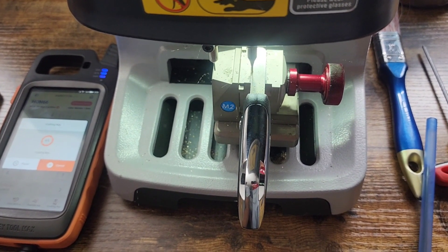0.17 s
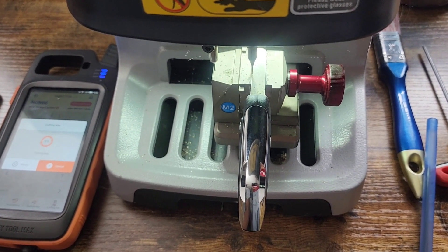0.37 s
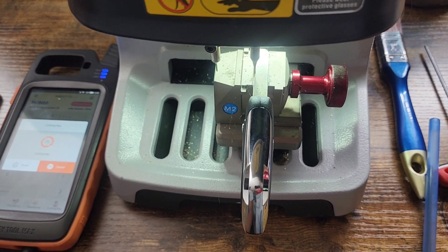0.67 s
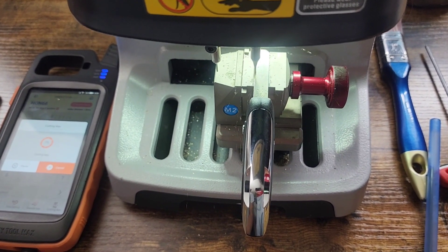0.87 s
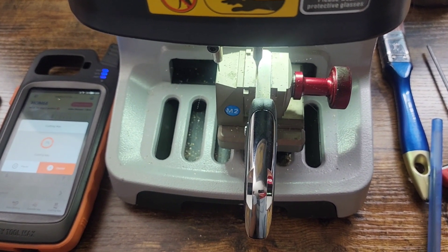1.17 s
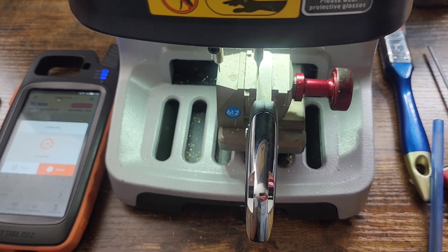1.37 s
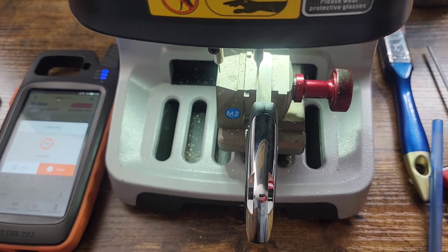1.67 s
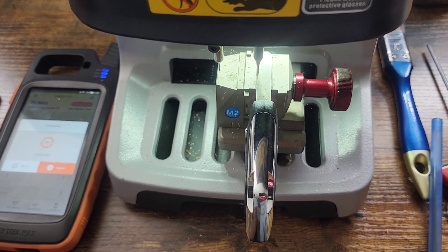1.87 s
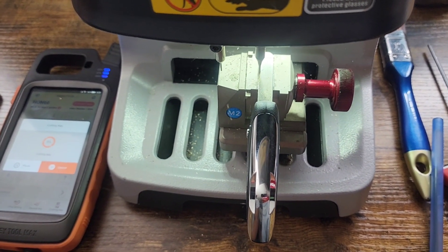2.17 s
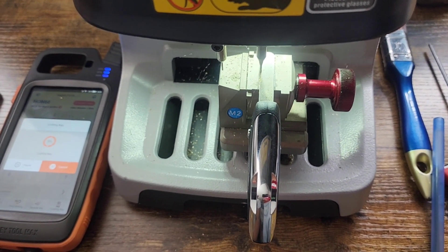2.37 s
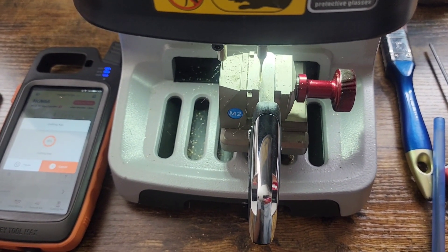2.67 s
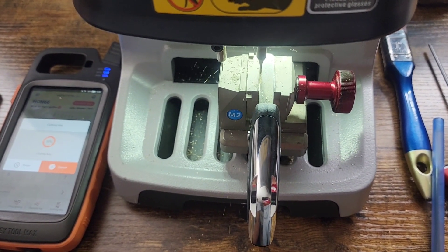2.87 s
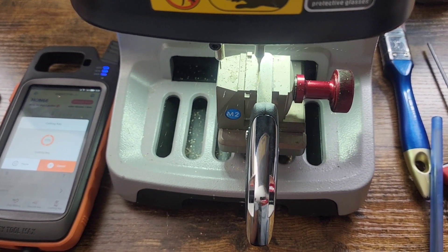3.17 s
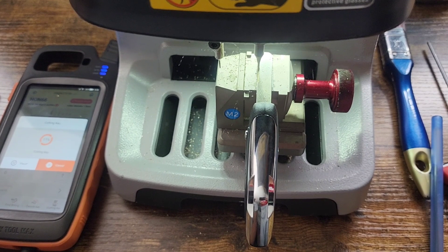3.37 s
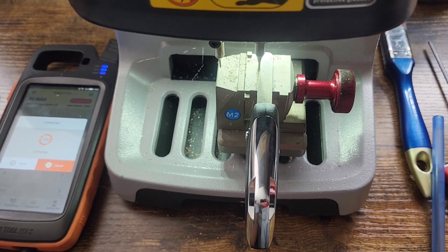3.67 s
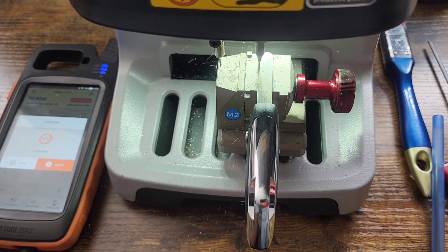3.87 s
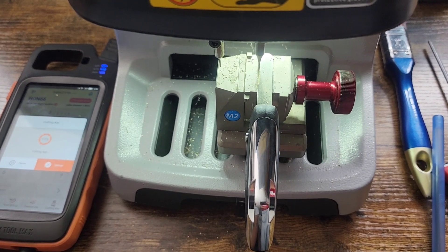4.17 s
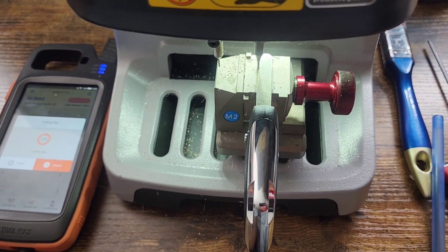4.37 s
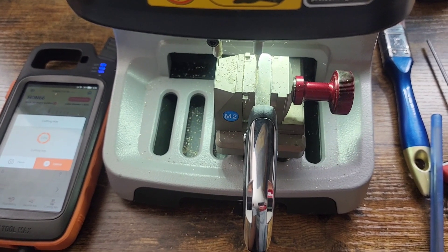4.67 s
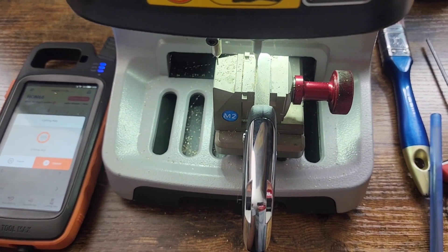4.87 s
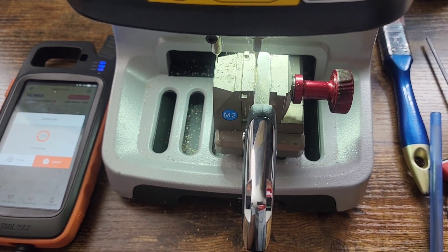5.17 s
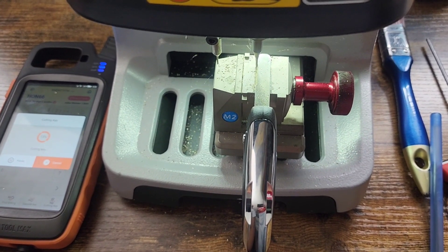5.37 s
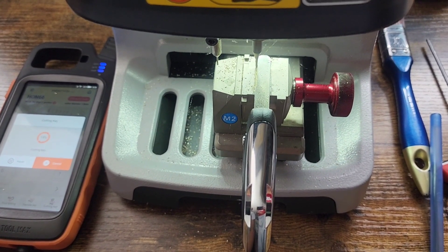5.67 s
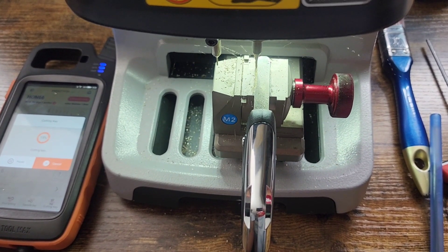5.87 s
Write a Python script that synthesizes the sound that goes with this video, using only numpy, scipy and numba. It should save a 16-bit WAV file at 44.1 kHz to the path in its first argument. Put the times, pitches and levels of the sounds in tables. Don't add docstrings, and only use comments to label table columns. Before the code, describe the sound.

A small key cutting machine drones with a steady buzzing hum and thin high whine, briefly dipping and knocking near the middle as it grinds metal.

```python
import sys
import numpy as np
from scipy import signal
from scipy.fft import rfft, irfft
from scipy.io import wavfile
from scipy.ndimage import uniform_filter1d, map_coordinates
from numba import njit

SR = 44100
rng = np.random.default_rng(int(sys.argv[2]) if len(sys.argv) > 2 else 0)


def master(y):
    cut = np.clip(np.atleast_2d(y).T, -1, 1)
    pcm = np.round(cut * 32767)
    wavfile.write(sys.argv[1], SR, pcm.astype(np.int16))


def gain_from_db(level_db):
    decades = np.asarray(level_db, float) / 20
    return 10 ** decades


N = 265790
TIME = np.arange(N) / SR
COARSE = TIME[::64]
NOMINAL = 199
FOLLOW = .35


def wobble(rate):
    knots = rng.standard_normal(int(N * 40 / SR) + 4)
    return map_coordinates(knots, [COARSE * min(rate, 39)])


def step(at_s, rise_s):
    return .5 + .5 * np.tanh((COARSE - at_s) / rise_s)


def coarse(rows):
    s, *cols = np.transpose(rows)
    return [np.interp(COARSE, s, c) for c in cols]


def turned(rate):
    return np.cumsum(np.interp(TIME, COARSE, rate)) / SR


@njit
def add(out, cycles, drift, left, right, lead):
    for i in range(len(cycles)):
        j = min(i // 64, len(drift) - 2)
        u = i / 64 - j
        phase = 2 * np.pi * cycles[i] + drift[j] + u * (drift[j + 1] - drift[j])
        out[0, i] += (left[j] + u * (left[j + 1] - left[j])) * np.sin(phase + lead)
        out[1, i] += (right[j] + u * (right[j + 1] - right[j])) * np.sin(phase)


def tone(cycles, left_db, right_db, lead, sway_db, flutter_db, jitter):
    shared_db = sway_db * wobble(0.98) + flutter_db * wobble(np.clip(cycles[-1] / 140, 4, 24))
    drift = jitter * wobble(np.clip(cycles[-1] / 90, 5, 25)) + 2 * np.pi * rng.random()
    left, right = [np.sqrt(2) * gain_from_db(db + shared_db + .5 * sway_db * wobble(0.77))
                   for db in (left_db, right_db)]
    out = np.zeros((2, N))
    add(out, cycles, drift, left, right, float(lead))
    return out


# time_s, speed_turns_per_s
SPEED = [(0, 199.15), (.55, 199.07), (1.15, 198.67), (1.85, 198.7), (2.4, 198.41), (2.72, 198.29),
         (3.15, 198.36), (3.55, 198.57), (3.85, 199.06), (4.0, 199.09), (4.3, 198.97), (4.9, 199.48),
         (5.3, 199.74), (5.45, 199.63), (5.62, 199.28), (5.77, 199.17), (5.9, 198.78), (6.03, 198.5)]
# time_s, flute_tone_db, depth (0-1, in the blank)
CUT = [
    (0, -23.4, 0.08),
    (1.7, -23, .05),
    (1.9, -24, .15),
    (2.6, -24.5, 0.69),
    (3.0, -24.5, .95),
    (4.1, -24.9, 1),
    (4.6, -24, 0.81),
    (5.7, -24, 0),
    (6.03, -25, .2),
]
DIP_S, DIP_HALF_S, DIP_DB = 2.75, .04, -10.5
SWELL_S, SWELL_HALF_S, SWELL_DB = 2.81, .03, 2


def motion():
    flute_db, depth = coarse(CUT)
    run_up, run_up_s, settle_s = 1.05, .009, .16
    since = np.maximum(COARSE - DIP_S - DIP_HALF_S, 0)
    gained = run_up * step(DIP_S + run_up_s, 2 * run_up_s) * np.exp(-(since / settle_s) ** 1.5)
    dip = np.maximum(1 - abs(COARSE - DIP_S) / DIP_HALF_S, 0)
    swell_after = np.exp(-((COARSE - SWELL_S) / SWELL_HALF_S) ** 2)
    return coarse(SPEED)[0] + gained, flute_db + DIP_DB * dip + SWELL_DB * swell_after, depth


def following(flute_db):
    return FOLLOW * (flute_db - flute_db.mean())


# pitch_hz, likeness (0-1)
ALIKE = [(60, .99), (300, 0.95), (480, 1), (1000, 0.13), (5000, 0.82), (14000, 0.22)]
# pitch_hz, lead_rad
LEAD = [(0, -0.57), (900, 0), (2000, 17), (3000, 21.5), (4400, 34), (6300, 39), (10000, 27), (15500, 41)]


def rush(table, patchy_db):
    z = signal.stft(rng.standard_normal((2, N + 1024)), nperseg=1024)[2]
    field = uniform_filter1d(rng.standard_normal(z.shape[1:]), size=4, axis=0)
    field = uniform_filter1d(field, size=12, axis=1)
    patchy = signal.istft(z * gain_from_db(patchy_db * field / field.std()), nperseg=1024)[1]
    a, b = rfft(patchy[:, :N + 1024])
    hz = np.fft.rfftfreq(N + 1024, 1 / SR)
    log_hz = np.log(hz + 1)
    f, left_db, right_db = np.transpose(table)
    colour = [gain_from_db(np.interp(log_hz, np.log(f), db, -150, -150)) for db in (left_db, right_db)]
    alike_hz, likeness = np.transpose(ALIKE)
    alike = np.clip(np.interp(log_hz, np.log(alike_hz), likeness), 0, 1)
    left = alike * a + np.sqrt(1 - alike ** 2) * b
    left = left * np.exp(1j * np.interp(hz, *np.transpose(LEAD)))
    return np.sqrt(SR / 2) * irfft(np.array([left * colour[0], a * colour[1]]), N + 1024)[:, :N]


# pitch_hz, left_db_per_hz, right_db_per_hz
BENCH = [(25, -75, -86), (42, -74, -82), (81, -72, -71.5), (140, -72, -75), (178, -71, -68.5),
         (271, -61, -62), (326, -66.5, -67), (356, -72.5, -72), (516, -79.5, -73.5), (592, -72, -62.5),
         (674, -66, -78), (850, -76, -74), (1030, -72.5, -75.5), (1303, -78.5, -77.5)]
HOOD = [(1270, -74.5, -80), (1560, -78, -77), (2010, -79, -75), (2430, -78.5, -78.5), (2540, -64, -66),
        (2510, -75, -86), (3080, -84.5, -70.5), (3580, -83, -79.5), (4530, -85, -67.5), (4530, -99, -67.5),
        (5040, -76.5, -75.5), (5780, -100.5, -79.5), (6740, -86, -86.5), (7750, -95, -83)]
CHIPS = [(7660, -91, -92), (8100, -99, -99), (8600, -85, -96), (8780, -101, -104), (9000, -85.5, -87),
         (10060, -90.5, -89.5), (10450, -108, -108), (11270, -83, -94), (11640, -100, -101),
         (12600, -90, -110), (13700, -84, -106), (14700, -77.5, -94), (15100, -89, -102),
         (15420, -101, -140)]


def cutting():
    chips = gain_from_db(.4 * (TIME - TIME.mean()))
    speed, flute_db, _ = motion()
    pulse = np.cos(2 * np.pi * turned(speed))
    knots = COARSE[::4]
    grit = gain_from_db(1.6 * np.interp(TIME, knots, rng.standard_normal(len(knots))))
    x = rush(BENCH, patchy_db=0.55)
    x += grit * (1 + 0.15 * pulse) * rush(HOOD, patchy_db=0.86)
    x += chips * (1 + 0.11 * pulse) * rush(CHIPS, patchy_db=1.0)
    return x * gain_from_db(0.34 + np.interp(TIME, COARSE, following(flute_db)))


# multiple, left_db, right_db, left_lead_rad
STEPS = [(3, -58.4, -53.3, -1.6), (4, -62.7, -56.8, -1.5), (5, -63.2, -49.2, -1.1), (6, -68.1, -58.4, -2.4),
         (7, -77.0, -61.2, -2.2), (8, -82.2, -70.0, 0.7)]
# pitch_hz, level_db (right port)
COVER = [(4952, -50), (4968, -45), (4983, -38.5), (4997, -33.8), (5022, -35), (5050, -33), (5066, -36.5),
         (5078, -41)]


def drives():
    step_hz = 925.93
    x = np.zeros((2, N))
    for k, left, right, lead in STEPS:
        db = -6 * (k == 3)
        x += tone(round(k) * step_hz * TIME, left + db, right + db, lead,
                  sway_db=1.3, flutter_db=4.5, jitter=0.45)
    speed, _, depth = motion()
    hz = 5022 - 84.5 * (speed - NOMINAL) - 11 * np.clip(depth, 0, 1)
    muffled_db = -4.5 * (1 - step(.76, 0.077))
    db = np.interp(hz, *np.transpose(COVER)) + muffled_db
    return x + tone(turned(hz), db - 16, db + .2, -1.2, sway_db=.3, flutter_db=.9, jitter=.3)


def bursts(rows, rest_db, edge_s):
    mean_db = np.mean(rows, axis=0)[2]
    level_db = rest_db
    for s, length, db in rows:
        level_db = level_db + (db - mean_db - rest_db) * (step(s, edge_s) - step(s + length, edge_s))
    return level_db


# order, left_db, right_db, left_lead_rad
BEARING = [(0.28, -49.1, -49.1, -0.2), (0.5, -48.6, -49.4, -0.2), (0.56, -48.2, -49.1, -0.2),
           (0.84, -66.4, -63.2, -0.1), (1.12, -49.1, -47.2, -0.2), (1.2, -52.2, -49.1, -0.3),
           (1.5, -43.1, -46.6, -0.1), (2.55, -57.3, -52.7, 0.5), (4.16, -59.1, -55.2, 0.4),
           (4.58, -55.6, -56.2, -1.0), (9.81, -60.2, -59.0, 2.9), (10.56, -46.7, -48.5, -0.9),
           (18.87, -54.9, -46.9, -0.1), (21.13, -59.7, -50.3, 2.8), (31.7, -62.0, -61.0, 0.7),
           (42.24, -62.5, -65.7, -0.2), (69.45, -62.1, -74.3, 2.5)]
# order, left_db, right_db, left_lead_rad
SIDEBANDS = [(-3, -61, -51.5, 1.3), (3, -51.3, -55.3, .45), (5, -57.5, -53.5, .5), (6, -58, -58.5, 1.8),
             (7, -53, -55, 2.5), (11, -86, -74, 1), (12, -51, -52, 0.53), (13, -69, -51, 1.2),
             (15, -59, -62, -1), (16, -78, -62.5, -2)]
# start_s, length_s, level_db
SINGS = [(0.019, 0.164, -50), (0.392, 0.189, -51), (0.691, 0.49, -48), (1.406, 0.042, -54),
         (1.526, 0.34, -49), (2.088, 0.26, -48), (2.453, 0.39, -49), (2.946, 0.48, -49), (3.473, 0.26, -48),
         (3.84, 0.52, -50), (4.417, 0.187, -50), (4.73, 0.78, -51), (5.556, 0.166, -51),
         (5.808, 0.094, -53), (5.959, 0.054, -52)]
# start_s, length_s, level_db
GRIPS = [(0.024, 0.29, -47), (0.375, 0.29, -47), (0.712, 0.187, -48), (1.008, 0.062, -49),
         (1.135, 0.37, -45), (1.654, 0.24, -44), (1.952, 0.31, -45), (2.377, 0.27, -47), (2.834, 0.34, -43),
         (3.243, 0.39, -46), (3.769, 0.27, -46), (4.107, 0.27, -47), (4.789, 0.52, -48),
         (5.579, 0.118, -47), (5.949, 0.06, -47)]


def bearings():
    speed, flute_db, depth = motion()
    after_dip = step(DIP_S, 0.048)
    share = .55 + (.58 - .55) * after_dip
    low_db = 4.8 - 4.5 * after_dip - 3.5 * depth
    turns, cage = turned(speed), turned(speed * share)
    swell = {
        .28: 1.5 + bursts(GRIPS, -8, 0.032),
        .56: 3 * depth - 2.5 + 2.7 * wobble(5.5),
        10.56: 0.52 + bursts(SINGS, -8, 0.041),
        4.58: 1.3 * (COARSE - COARSE.mean())}
    x = np.zeros((2, N))
    for k, left, right, lead in BEARING:
        db = swell.get(k, 0) - 8 * (k == .5)
        x += tone(k * turns, left + db, right + db, lead, sway_db=1.03 * (k not in swell),
                  flutter_db=1.5, jitter=0.35 if k in (1.5, 10.56) else 0.68)
    x += tone(12.85 * turns, -53, -57, .3, sway_db=.8, flutter_db=3.5, jitter=1.6)
    for k, left, right, lead in SIDEBANDS:
        near = np.clip(2.5 - abs(k) * .4, 0, 1 if k > 0 else .65)
        db = low_db * near + following(flute_db)
        cycles = round(abs(k)) * turns + np.sign(k) * cage
        x += tone(cycles, left + db, right + db, lead, sway_db=1.62, flutter_db=3, jitter=0.55)
    return x


# order, left_db, right_db
UPPER = [(25, -73, -59), (29.8, -77, -68.5), (38, -78, -70.5), (44, -76, -78), (49.4, -71, -78),
         (61, -84, -73), (73, -63, -86), (77, -72, -83)]
RINGING = {28: (-67.8, -59.1), 36: (-72.9, -62.6), 45: (-67.2, -72.8), 48: (-66.6, -65.4),
           51: (-56.3, -61.9), 69: (-59.1, -76), 71: (-63.9, -73.5), 72: (-54.6, -70.9), 73: (-61.6, -73),
           74: (-58.9, -74), 75: (-61.8, -72.3)}


def upper():
    k = np.arange(25, 78)
    order, *sides = np.transpose(UPPER)
    struck_db = 3.5 * (k % 3 == 0)
    db = [np.interp(k, order, side) + struck_db + 4.5 * rng.standard_normal(len(k)) for side in sides]
    return [(n, *RINGING.get(n, (left, right))) for n, left, right in zip(k, *db)]


# order, left_db, right_db, left_lead_rad
SHAFT = [(1, -34.0, -34.4, -0.2), (2, -44.2, -38.8, -0.6), (3, -21.8, -26.9, 0.0), (4, -42.0, -52.4, 0.4),
         (5, -42.1, -48.1, -2.2), (6, -58.7, -57.5, 2.4), (7, -49.8, -52.3, -0.6), (8, -60.9, -50.8, -1.8),
         (9, -53.6, -47.7, -0.4), (10, -63.8, -51.9, -2.4), (11, -59.1, -56.2, 2.2),
         (12, -49.9, -58.3, -0.3), (13, -60.3, -56.5, 0.9), (14, -57.8, -51.8, -2.8),
         (15, -50.0, -49.2, -2.9), (16, -65.0, -53.1, 1.2), (17, -60.8, -58.5, -3.0),
         (18, -63.9, -50.8, -3.0), (19, -64.7, -59.2, 0.7), (20, -75.4, -54.3, 1.2),
         (21, -61.3, -54.3, -0.6), (22, -65.9, -49.6, -1.7), (23, -66.1, -46.0, 0.9),
         (24, -67.8, -54.7, -2.6)]
# level_db, full_depth_db, speed_db_per_turn_per_s, travel_db_per_s
PANEL = [
    (1.5, -3.3, 0, 0),
    (.6, -1.2, 2.8, 0),
    (-5.8, 0, 0, 1.9),
    (-2.8, 3.8, -6, 0),
]


def spindle():
    speed, flute_db, depth = motion()
    turns, fast = turned(speed), speed - NOMINAL
    travel = np.minimum(COARSE, 4.4)
    shaft_db = -32.5 - 4 * depth
    balance_db = 5.5 - .9 * fast - .08 * COARSE - 5
    levels = [db + deep * depth + quick * fast + far * travel for db, deep, quick, far in PANEL]
    panel = dict(zip((4, 5, 12, 23), levels))
    panel.update({2: .6 * panel[5], 4: panel[4] - .42 * panel[12] - 1.3, 8: 2 * panel[4],
                  7: -.45 * panel[12] - 1.2, 9: .7 * panel[23], 22: 5 * fast - 1})
    x = tone(3 * turns, flute_db + 2.3 + .4 * balance_db, flute_db - 2.7 - .6 * balance_db, 0.,
             sway_db=0, flutter_db=.3, jitter=.03)
    x += tone(turns, shaft_db + 0.27, shaft_db - .3, -0.17, sway_db=0.33, flutter_db=0.77, jitter=0.064)
    for k, left, right, lead in SHAFT[1:2] + SHAFT[3:]:
        db = 0.067 + panel.get(k, 0) + following(flute_db)
        x += tone(k * turns, left + db, right + db, lead,
                  sway_db=0.69 * (k not in panel), flutter_db=0.35, jitter=0.11)
    for k, left, right in upper():
        x += tone(round(k) * turns, left - .7, right - .7, np.pi + rng.normal(0, 1.43),
                  sway_db=1.2 if k in RINGING else 2.4, flutter_db=1.5, jitter=0.18)
    return x


def short_pulse():
    at_s, half_s = 2.777, .02
    pulse = gain_from_db(-38) * np.exp(-((TIME - at_s) / half_s) ** 2) * np.sin(2 * np.pi * 818 * TIME)
    return pulse * gain_from_db([[3], [-6]])


def scene():
    return cutting() + drives() + bearings() + short_pulse() + spindle()


def band_limit(x):
    return signal.sosfilt(signal.butter(12, 15500, fs=SR, output="sos"), x)


def record(dry):
    hz = np.fft.rfftfreq(N, 1 / SR)
    roll_off = gain_from_db(-10 * np.clip((hz - 15150) / 60, 0, 1))
    heard = irfft(rfft(dry) * roll_off, N)
    return band_limit(heard)


dry = scene()
out = record(dry)
master(out)
```